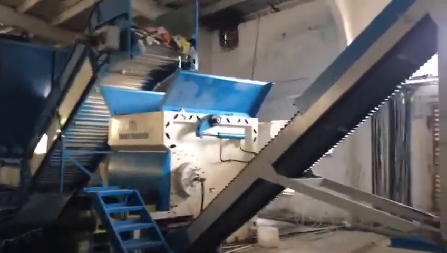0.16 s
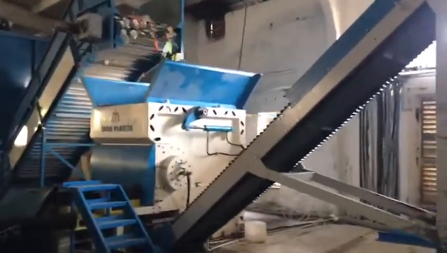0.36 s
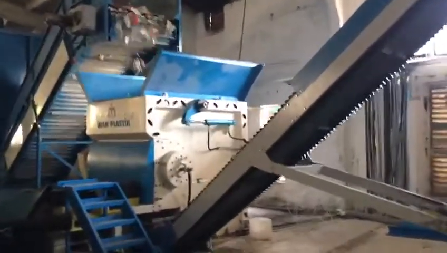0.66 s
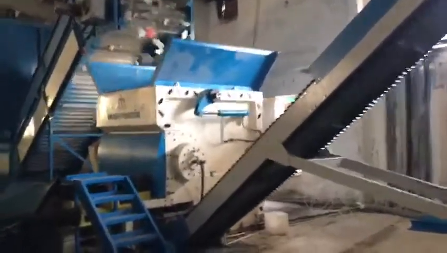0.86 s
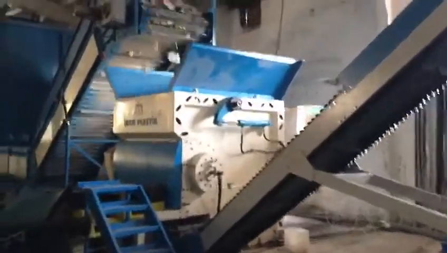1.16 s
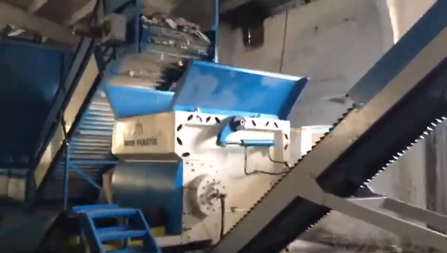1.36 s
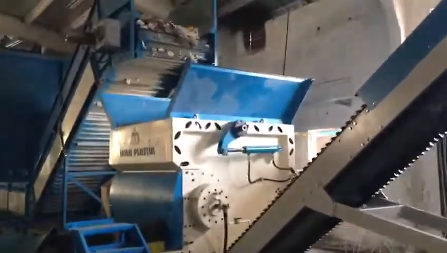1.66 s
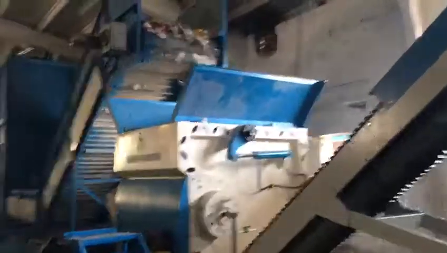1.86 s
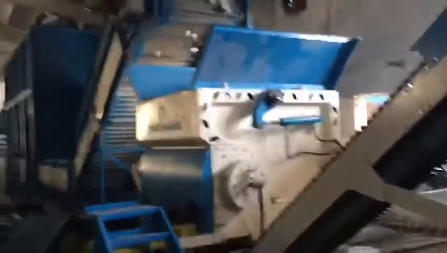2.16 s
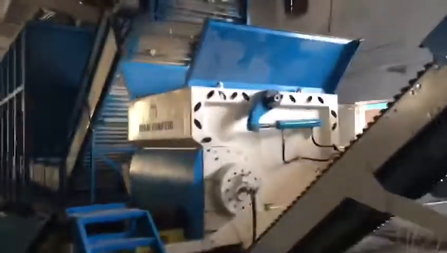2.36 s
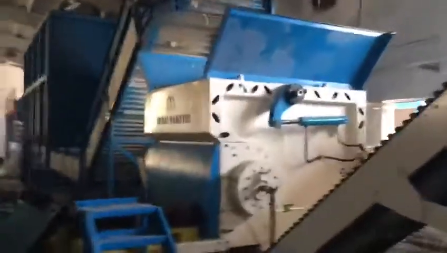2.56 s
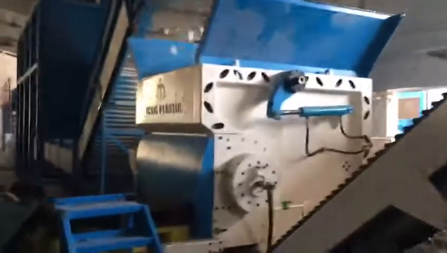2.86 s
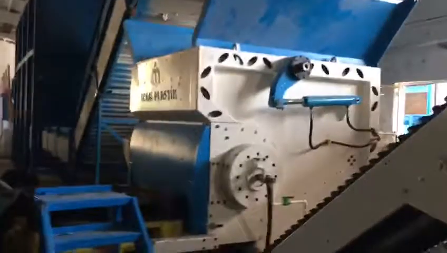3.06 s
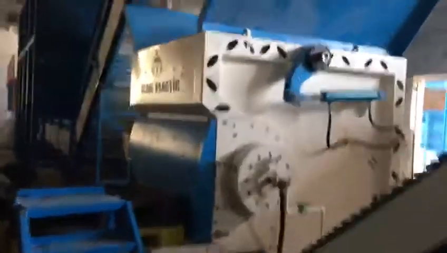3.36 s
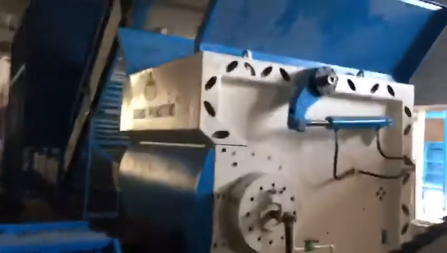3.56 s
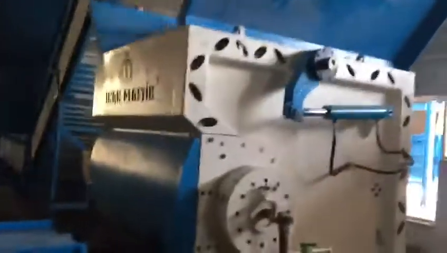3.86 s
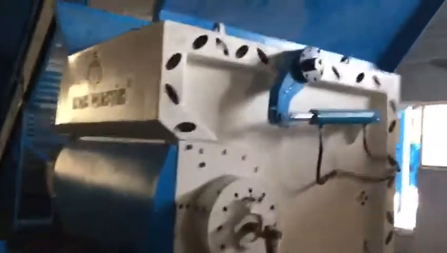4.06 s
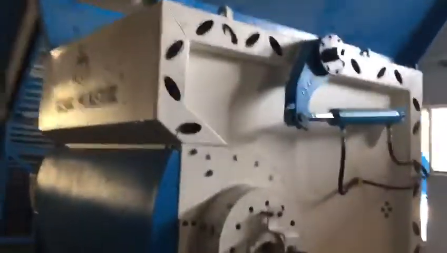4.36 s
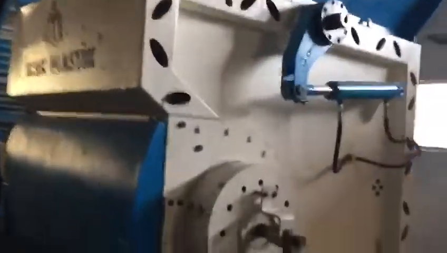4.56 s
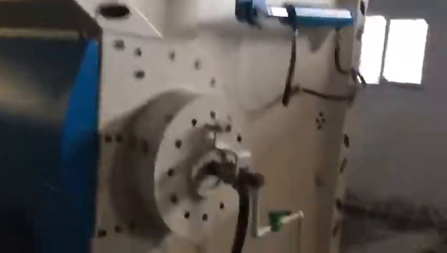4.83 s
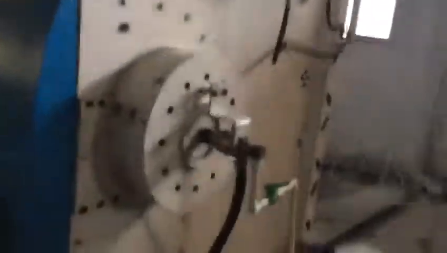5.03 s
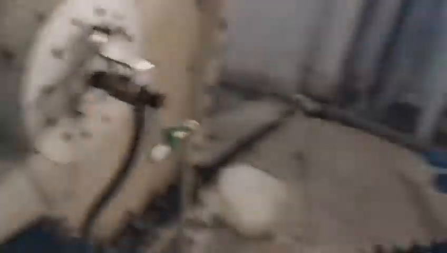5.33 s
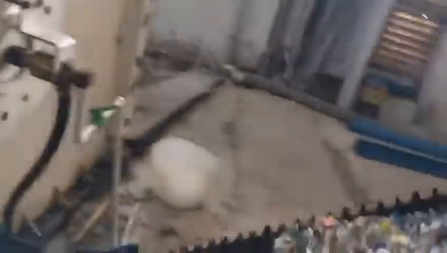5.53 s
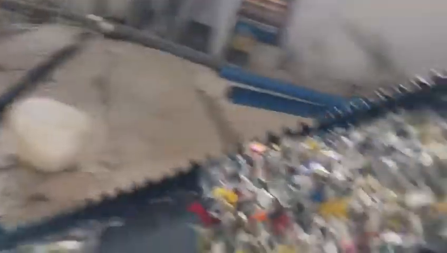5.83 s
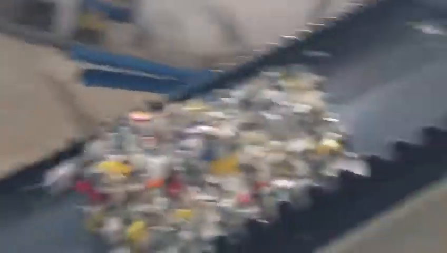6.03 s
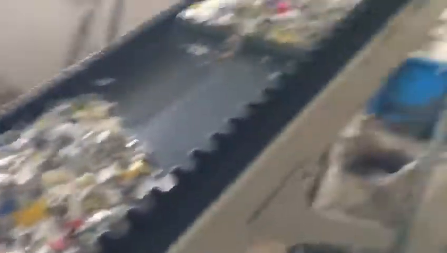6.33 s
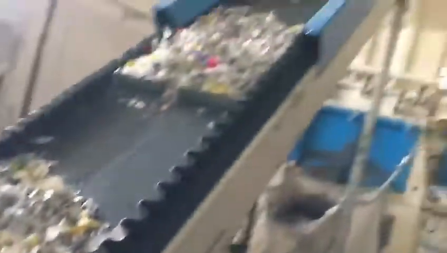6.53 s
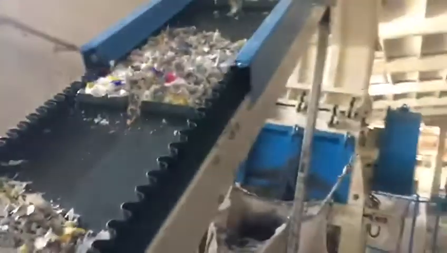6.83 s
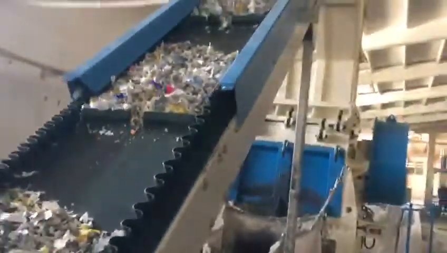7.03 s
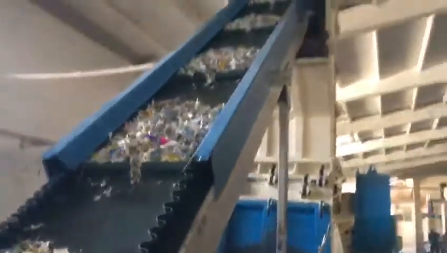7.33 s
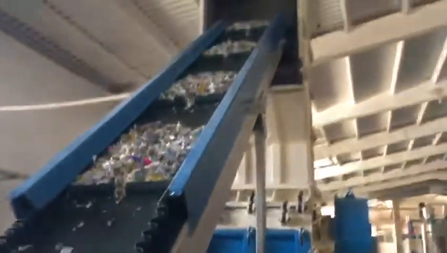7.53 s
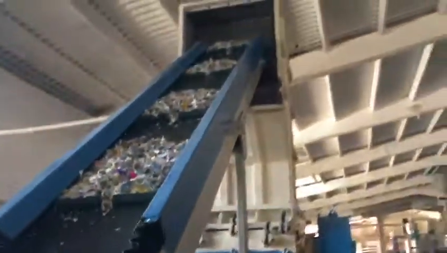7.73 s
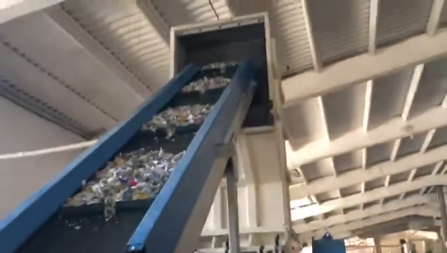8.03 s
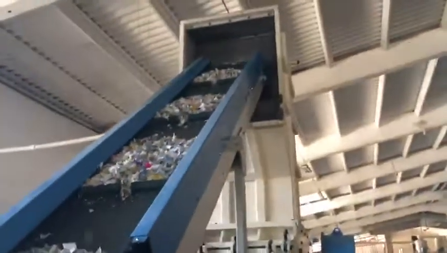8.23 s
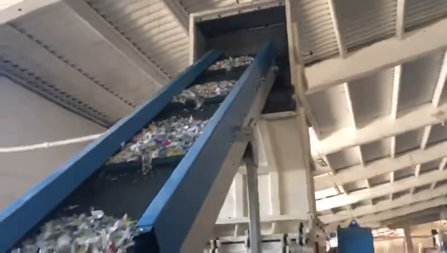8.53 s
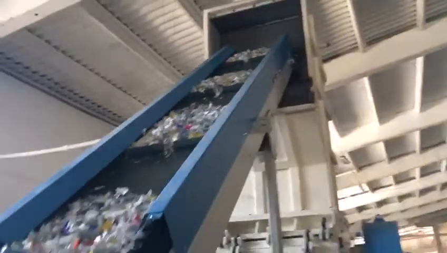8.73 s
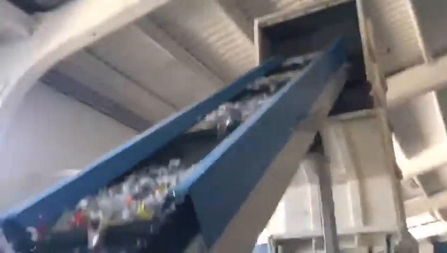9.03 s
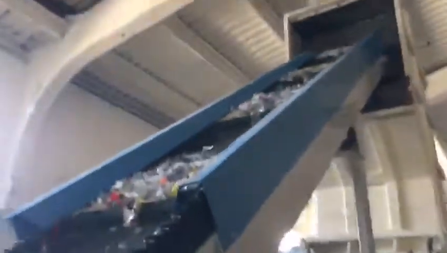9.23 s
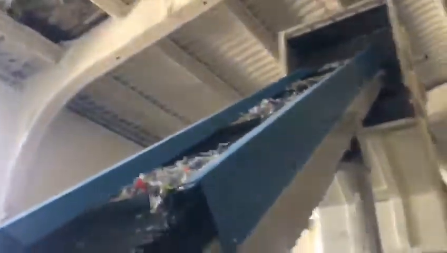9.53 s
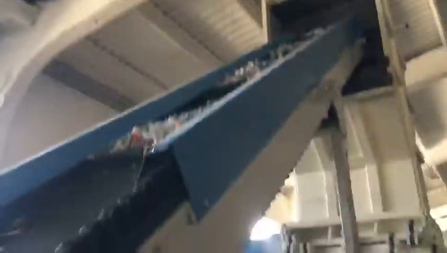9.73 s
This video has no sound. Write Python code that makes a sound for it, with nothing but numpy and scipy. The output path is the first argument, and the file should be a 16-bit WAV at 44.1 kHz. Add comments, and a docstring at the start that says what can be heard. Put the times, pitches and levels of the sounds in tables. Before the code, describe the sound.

Heavy industrial drone with no pause, low and throbbing, under coarse grinding and sharp brittle snapping of plastic. Handfuls of flakes shower over steel in short hissing bursts, clustered around five seconds. The moving microphone gets nearer, brighter and rougher until about four seconds, passes tumbling chips at six, then hears a faint high whine beside the belt, while the hard hall blurs everything and the hum swells and fades.

```python
"""A large plastic shredder runs in a concrete hall: motors hum, hopper and housing drone at about 45 cuts/s.
From the start plastic grinds, cracks and trickles as flakes; a bite into fresh material comes about once a second.
The microphone nears the chamber until 3.7 s, rounds the machine's corner from 4.2 s, passes the chute foot
at 6.2 s, then turns to the conveyor and its thin whine. Hum is summed cosines, plastic is filtered random clicks;
the hall blurs the clicks and its standing waves swell and fade the hum along the walk."""
import sys
import numpy as np
from scipy import signal
from scipy.fft import rfft, irfft
from scipy.io import wavfile

SR = 44100
rng = np.random.default_rng(int(sys.argv[2]) if len(sys.argv) > 2 else 0)


def output_pcm(signal):
    """Save a mono or channel-first signal as 16-bit PCM at the path in sys.argv[1].

    Samples are clipped to [-1, 1] before scaling.
    """
    pcm = np.clip(np.atleast_2d(signal).T, -1, 1) * 32767
    wavfile.write(sys.argv[1], SR, np.round(pcm).astype(np.int16))


N = 436149
TIME = np.arange(N) / SR
FFT_SIZE = 2 ** 19
CONTROL_STEP = 100   # samples per drift value
HALL_T60_S = 0.82
# walk: closest approach, time from there to half closeness
CHAMBER_PASS_S, CHAMBER_REACH_S = 3.66, 1.34
CHUTE_PASS_S, CHUTE_REACH_S = 6.18, 0.33
# start of the turn round the machine's corner and of the turn to the conveyor; duration of each
CORNER_S, CONVEYOR_S, TURN_S = 4.166, 6.33, 0.77


def from_db(db):
    """Decibels to gain."""
    return 10 ** (np.asarray(db) / 20)


def rms_one(x):
    """Scale to unit power."""
    return x / np.sqrt(np.mean(np.abs(x) ** 2) + 1e-20)


def at_hz(points, hz):
    """Read a spectrum in dB on a log-frequency axis."""
    known_hz, level_db = np.transpose(points)
    return np.interp(np.log(hz + 1e-9), np.log(known_hz), level_db)


def coloured(x, spectrum):
    """Filter x by a spectrum; rms 1."""
    gain = from_db(at_hz(spectrum, np.fft.rfftfreq(FFT_SIZE, 1 / SR)))
    filtered = irfft(rfft(x, FFT_SIZE) * gain)
    return rms_one(filtered[:N])


def drift(rate_hz):
    """Noise through a double-pole lowpass, turning about rate_hz times a second; rms 1."""
    pole = np.exp(-2 * np.pi * rate_hz * CONTROL_STEP / SR)
    noise = rng.standard_normal(N // CONTROL_STEP + 2002)
    slow = signal.lfilter([1], [1, -2 * pole, pole * pole], noise)[2000:]   # drop the settling
    return np.interp(np.arange(N) / CONTROL_STEP, np.arange(len(slow)), rms_one(slow))


def grains(per_s, spread_db):
    """Random clicks of either sign: many small, a few large; rms 1."""
    sizes = from_db(spread_db * np.minimum(rng.exponential(1, N), 4))
    signs = rng.choice([-1, 1], N)
    return rms_one(sizes * signs * (rng.random(N) < per_s / SR))


def hall(x, direct_db):
    """Direct sound plus a diffuse field: noise carrying the decaying energy of all earlier grains."""
    keep = from_db(-120 / (HALL_T60_S * SR))   # energy factor per sample
    energy, _ = signal.lfilter([1 - keep], [1, -keep], x ** 2, zi=[1])
    return from_db(direct_db) * x + np.sqrt(energy) * rng.standard_normal(N)


def swell(start_s, length_s, attack_s, release_s):
    """Rise, hold until the length is over, fall; 0-1."""
    end_s = start_s + max(length_s, attack_s) + release_s
    return np.clip(np.minimum((TIME - start_s) / attack_s, (end_s - TIME) / release_s), 0, 1)


def passing(closest_s, reach_s):
    """Inverse-square closeness on a straight walk past a point; 0-1."""
    return 1 / (1 + ((TIME - closest_s) / reach_s) ** 2)


def turned(start_s):
    """Progress of a turn of the walk; 0-1."""
    return np.clip((TIME - start_s) / TURN_S, 0, 1)


def partial(turn, order, scatter, walk_hz):
    """One multiple of a rate; reflections add to it with a phase that changes along the walk; rms 1."""
    angle = 2 * np.pi * order * turn
    in_phase = (1 + scatter * drift(walk_hz)) * np.cos(angle)
    quadrature = scatter * drift(walk_hz) * np.sin(angle)
    return rms_one(in_phase + quadrature)


def cut_strength(turn, uneven_db):
    """No two cuts bite the same amount of plastic; rms 1."""
    cuts = rng.standard_normal(1000)
    return rms_one(from_db(uneven_db * np.interp(turn, np.arange(len(cuts)), cuts)))


# motor and drive tones: f/Hz, level/dB rms
MOTOR_TONES = [(53.5, -41.5), (99.8, -36.5), (156, -32.5), (164, -46), (206, -43.5), (300, -40.5),
               (399, -44.5), (531, -44)]


def motors():
    """Motors and conveyor drives hum steadily behind the shredder."""
    return sum(from_db(db) * partial(hz * TIME, 1, scatter=.9, walk_hz=0.6) for hz, db in MOTOR_TONES)


# nodes (-) and crests (+) on the walk: multiple of cutting rate, t/s, half width/s, level/dB
STANDING_WAVES = [(2, 4.8, .25, -6), (2, 7.45, .25, 5), (3, 2.68, .76, -15), (3, 4.24, .45, 2.5),
                  (4, 1.5, .5, -13), (4, 9.45, .6, -8), (6, 1.22, .37, -12), (6, 4.37, .42, -7),
                  (7, 3.33, .28, -11), (7, 4.45, .28, -14), (7, 6.37, .32, -12), (7, 9.69, .21, -7),
                  (8, 1.8, .2, 4), (8, 6.87, .65, -11), (8, 8.28, .4, -7), (8, 3.0, .2, -5),
                  (9, 2.65, .35, -8), (9, 3.9, .24, -9), (9, 5.64, .77, 5.5), (10, 0.0, .2, 8),
                  (10, 1.06, .24, 7), (10, 1.45, .18, -10), (10, 2.3, .46, 13), (10, 3.88, .19, 8),
                  (10, 5.26, .24, -7), (10, 7.38, .44, -13), (11, 1.27, .18, -12), (11, 4.91, .15, -12),
                  (11, 6.55, .25, 4)]


def hum_gain(row, load, near):
    """Hum line gain: follows load and walk, fades and swells with its standing wave."""
    multiple, idle_db, load_db, near_db, corner_db = row
    standing_db = sum(db * np.exp(-((TIME - s) / width_s) ** 2)
                      for k, s, width_s, db in STANDING_WAVES if round(k) == round(multiple))
    walk_db = near_db * near + corner_db * turned(CORNER_S)
    return from_db(idle_db + load_db * load + walk_db + standing_db)


# multiple of cutting rate, idle level/dB, rise at full load/dB, change at chamber/dB, change round corner/dB
HOPPER_HUM = [(1, -28, 1, 1.2, -8.5), (2, -34.5, 7, 2.9, 2), (3, -18.5, 4, -3, -.4),
              (4, -26.5, 4, 2.5, -2.5), (5, -41, 4, 1, 4.5)]


def hopper(turn, load, near):
    """Low multiples peak nearly together, one thud a cut; the third booms steadily, other lags drift."""
    hum = 0
    for row in HOPPER_HUM:
        k = round(row[0])
        if k == 3:
            wave = partial(turn, k, scatter=0.074, walk_hz=0.85)
        else:
            lag_turns = 0.14 * drift(0.26) / k
            wave = partial(turn + lag_turns, k, scatter=.13, walk_hz=1.7)
        hum = hum + hum_gain(row, load, near) * wave
    return hum * cut_strength(turn, uneven_db=1.36)


# multiple of cutting rate, idle level/dB, rise at full load/dB, change at chamber/dB, change round corner/dB
PANEL_HUM = [(6, -28.5, .1, -1.5, -4), (7, -33.5, 5.8, 7.5, -1), (8, -35, 6.1, 2.5, 4.5),
             (9, -32, 9.9, 0.7, -8.5), (10, -41, 4.6, 7.4, 7.5), (11, -37, 5.2, -1, 1.5),
             (12, -35.5, 1, 3, -3.5)]


def housing(turn, load, near, strength):
    """Steel panels drone under the cuts, each with its own lag."""
    panels = 0
    for row in PANEL_HUM:
        wave = partial(turn + rng.random(), round(row[0]), scatter=.12, walk_hz=1.9)
        panels = panels + hum_gain(row, load, near) * wave
    return panels * strength


# frame rumble spectrum: f/Hz, level/dB per Hz
RUMBLE_TONE = [(15, -18), (34, -21), (48, 4.5), (75, 5.5), (120, 3.5), (165, 7), (230, 2), (320, 0),
               (450, -5), (700, -23)]


def frame_rumble(crushed, near):
    """Lumps tumbling in the chamber shake the heavy frame: low filtered noise."""
    level_db = -25.0 + 2.4 * crushed + 4.9 * near
    return from_db(level_db) * coloured(rng.standard_normal(N), RUMBLE_TONE)


# knife buzz relative to grinding: f/Hz, level/dB
BUZZ_LINES = [(540, -7), (620, -22), (800, -20), (1000, -17), (1120, -18), (1250, -19.5), (1480, -27),
              (1630, -21), (1800, -26), (2200, -19)]


def knives(turn):
    """The sharp edge of each cut buzzes at high multiples; it arrives mostly by reflection."""
    multiples = np.arange(13, 44)
    mean_cuts_per_s = turn[-1] / TIME[-1]
    levels_db = at_hz(BUZZ_LINES, multiples * mean_cuts_per_s)
    return sum(from_db(db) * partial(turn + rng.random(), k, scatter=3.2, walk_hz=1.9)
               for k, db in zip(multiples, levels_db))


# grinding spectrum: f/Hz, level/dB per Hz
GRINDING_TONE = [(250, -15), (450, -1), (600, -1), (800, -3), (1150, 0), (1450, -1.8), (1700, -3),
                 (2200, -7.5), (2800, -15.5), (4500, -34)]


def grinding(turn, crushed, near):
    """Plastic is crushed in step with the knives: clicks swelling once a cut, plus the knife buzz."""
    level_db = -26.4 + 3.9 * crushed + 3.0 * near - 0.25 * turned(CORNER_S)
    cut_db = 1.4 * np.cos(2 * np.pi * turn) + 1.8 * drift(25)
    crush = hall(from_db(cut_db) * grains(per_s=4000, spread_db=4.0), direct_db=-1)
    return from_db(level_db) * (from_db(-0.45) * coloured(crush, GRINDING_TONE) + knives(turn))


# handfuls of flakes: t/s, length/s, level/dB
SPILLS = [(-0.1, .6, -40.5), (1.33, 0.43, -45), (3.58, 0.59, -41), (4.58, 0.27, -37), (4.983, 0.28, -35.5),
          (5.37, .11, -34.5), (5.638, 0.51, -37.5), (6.22, 0.55, -41.5), (7.027, 0.24, -36),
          (9.023, 0.39, -35.5)]
SPILL_ATTACK_S, SPILL_RELEASE_S = 0.068, 0.21


def spill_power():
    """Handfuls of flakes slide over steel; their powers add."""
    return sum((from_db(db) * swell(s, length_s, SPILL_ATTACK_S, SPILL_RELEASE_S)) ** 2
               for s, length_s, db in SPILLS)


# cracking spectrum: f/Hz, level/dB per Hz
CRACKING_TONE = [(1200, -9.5), (2300, 1.5), (2900, -0.5), (3400, 0), (4400, -3), (4950, -7), (5300, -4),
                 (6300, -6), (7100, -10.5), (8200, -15.5), (12000, -44)]


def cracking(turn, crushed, near, spills):
    """Plastic snaps in clumps; the larger pieces in each spill snap against the steel too."""
    level_db = -33.4 + 2.0 * crushed + 7.3 * near + 2.7 * turned(CORNER_S)
    # every third cut, once a rotor turn, throws more pieces against the chamber wall
    revolution = np.cos(2 * np.pi * turn / 3)
    snaps_per_s = 2500 * from_db(3 * drift(20) + 2.2 * revolution)
    snaps = hall(grains(snaps_per_s, spread_db=3.0), direct_db=-3.0)
    level = np.hypot(from_db(level_db), from_db(1.0) * np.sqrt(spills))
    return level * coloured(snaps, CRACKING_TONE)


# flake spectrum: f/Hz, level/dB per Hz
FLAKE_TONE = [(4500, -14), (6500, 8.5), (7700, 2.5), (8500, 8), (12500, -8)]


def flakes(near, spills):
    """Flakes shower onto steel: a steady trickle of clicks plus the spills."""
    trickle_db = -50 + 5 * near + 3 * turned(CORNER_S)
    shower = hall(grains(per_s=5000 * from_db(4.5 * drift(13)), spread_db=5.0), direct_db=-2.0)
    return np.sqrt(from_db(trickle_db) ** 2 + spills) * coloured(shower, FLAKE_TONE)


# chute spectrum: f/Hz, level/dB per Hz
CHUTE_TONE = [(1100, -24), (1500, -5.5), (1900, -0.5), (2350, -3.5), (2750, -17.5), (3300, -13.5),
              (4500, -31)]


def chute(near):
    """Cut flakes tumble down a steel chute to the belt; loud near the chamber and at the chute foot."""
    tumbling = hall(grains(per_s=1800 * from_db(3.7 * drift(22)), spread_db=5.5), direct_db=-4.5)
    from_chamber = from_db(-45 + 12 * near)
    from_foot = from_db(-30.5) * np.sqrt(passing(CHUTE_PASS_S, CHUTE_REACH_S))
    return np.hypot(from_chamber, from_foot) * coloured(tumbling, CHUTE_TONE)


# crunch spectrum: f/Hz, level/dB per Hz
CRUNCH_TONE = [(400, -30), (600, 3), (720, -2.5), (900, -5.5), (1100, -10.5), (1500, -24)]


def chamber_crunch(crushed, near):
    """Close to the chamber the dull crunch of lumps comes through the wall."""
    lumps = hall(grains(per_s=900, spread_db=3), direct_db=4)
    return from_db(-28.5 + 9.7 * crushed) * near * coloured(lumps, CRUNCH_TONE)


def conveyor_whine(turn, load, strength):
    """A thin whine at 25 times the cutting rate comes down the conveyor, rising with load."""
    level = from_db(-44.5 + 9.0 * load) * turned(CONVEYOR_S)
    return level * partial(turn, order=25, scatter=.6, walk_hz=2.54) * strength


# bites into fresh plastic: t/s, feeding time/s, rotor load (1 = full bite), amount crushed (1 = full bite)
BITES = [(0.28, 0.37, 1.14, 1.03), (0.72, 0.3, 0.56, .15), (1.47, 0.37, 1.16, 0.63),
         (1.95, 1.087, 0.64, 0.098), (3.56, 0.797, 1.04, 0.21), (4.92, .37, .95, 0.88),
         (5.4, 0.73, 0.34, 0.75), (6.04, 0.725, 0.604, 0.25), (6.99, 0.55, 1.07, 0.72),
         (8.17, .5, 0.95, 0.58), (9.09, 0.57, 1.345, 0.95)]
BITE_ATTACK_S, BITE_RELEASE_S = .36, 0.3487
CRUSH_LEAD_S = 0.09   # the wad cracks just before the rotor feels its full load


def feed():
    """Each bite swells the rotor load and, slightly earlier, the amount crushed."""
    load = sum(share * swell(s, length_s, BITE_ATTACK_S, BITE_RELEASE_S)
               for s, length_s, share, _ in BITES)
    crushed = sum(share * swell(s - CRUSH_LEAD_S, length_s, BITE_ATTACK_S, BITE_RELEASE_S)
                  for s, length_s, _, share in BITES)
    return load, crushed


IDLE_CUTS_PER_S, FULL_LOAD_SAG_CUTS_PER_S = 44.85, .16


def scene():
    """Each bite crushes plastic, slows the rotor and swells the hum; both channels hear the same."""
    load, crushed = feed()
    near = passing(CHAMBER_PASS_S, CHAMBER_REACH_S)
    turn = np.cumsum(IDLE_CUTS_PER_S - FULL_LOAD_SAG_CUTS_PER_S * load) / SR   # cuts made so far
    strength = cut_strength(turn, uneven_db=1.0)
    spills = spill_power()
    machine = motors() + hopper(turn, load, near) + housing(turn, load, near, strength)
    machine = machine + frame_rumble(crushed, near)
    plastic = grinding(turn, crushed, near) + cracking(turn, crushed, near, spills) + flakes(near, spills)
    sound = machine + plastic + chute(near) + chamber_crunch(crushed, near)
    sound = sound + conveyor_whine(turn, load, strength)
    return np.array([sound, sound])


CUTOFF_HZ = 11150


def record(dry):
    """Clip peaks at full scale, then lowpass steeply."""
    lowpass = signal.cheby2(16, 70, CUTOFF_HZ, fs=SR, output="sos")   # order, stopband dB, stopband edge
    return signal.sosfilt(lowpass, np.clip(dry, -1, 1))


dry = scene()
out = record(dry)
output_pcm(out)
```